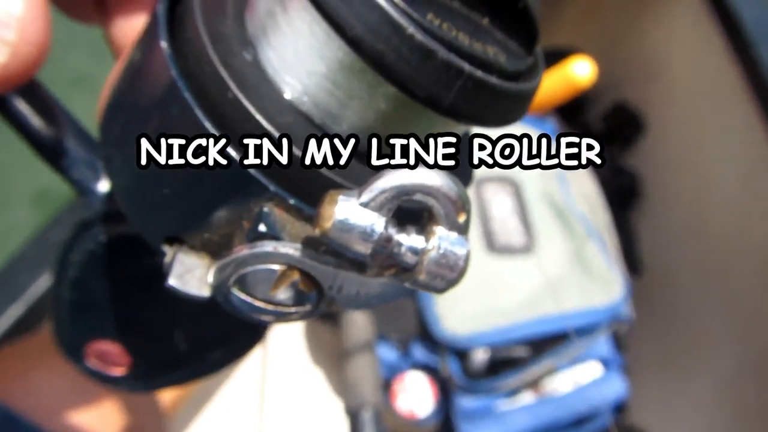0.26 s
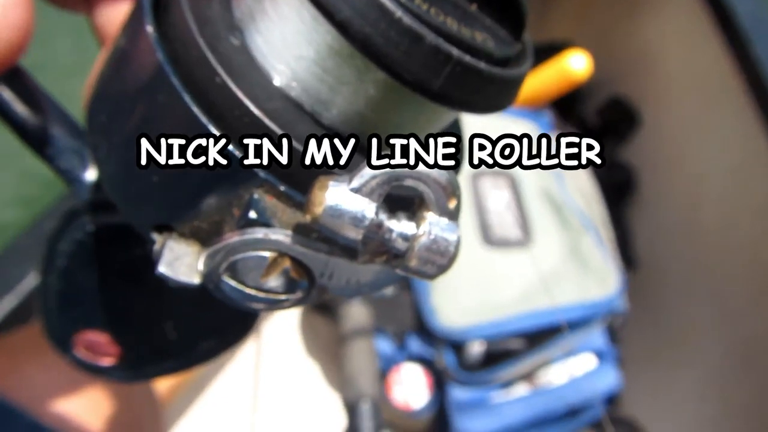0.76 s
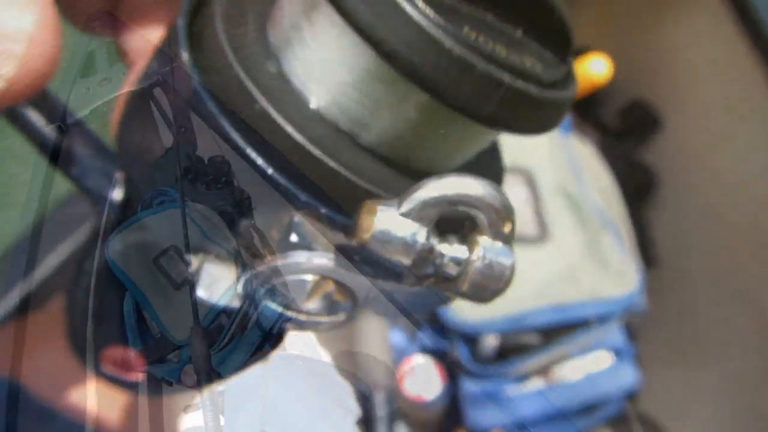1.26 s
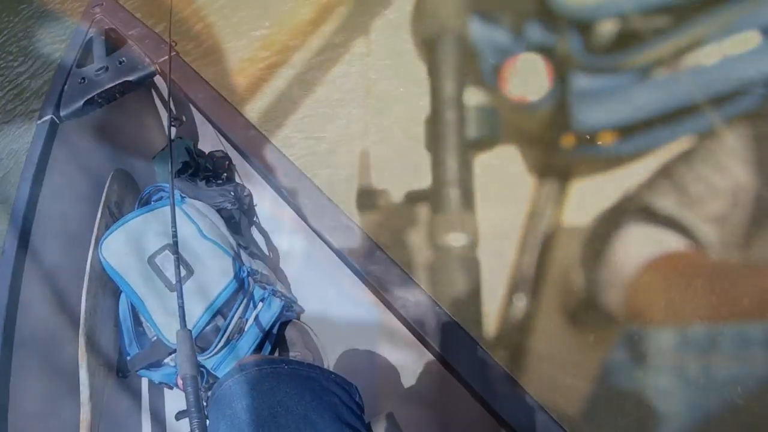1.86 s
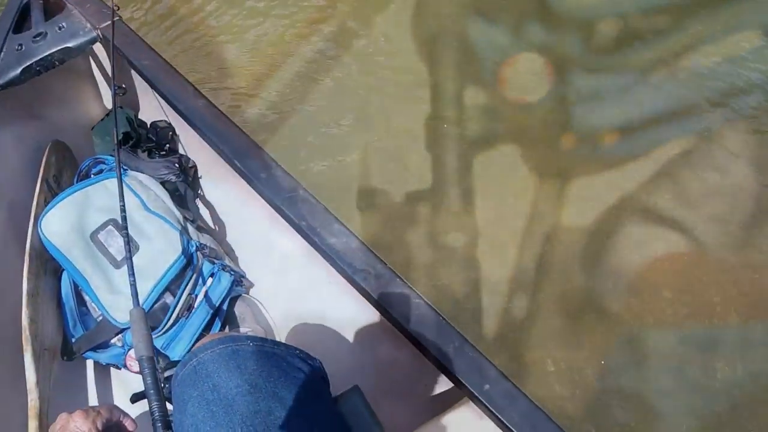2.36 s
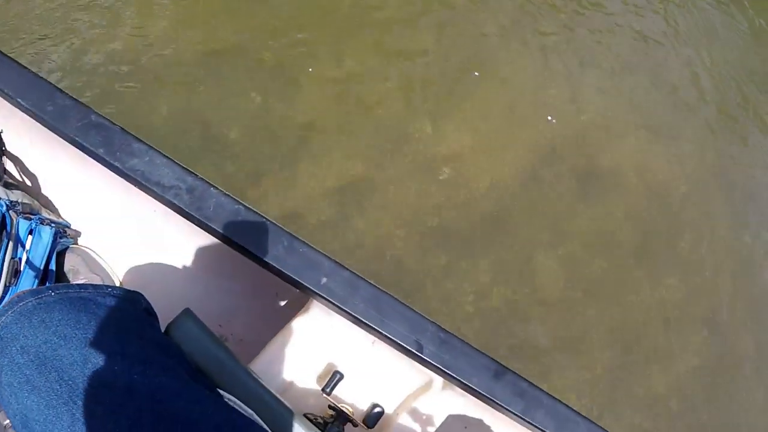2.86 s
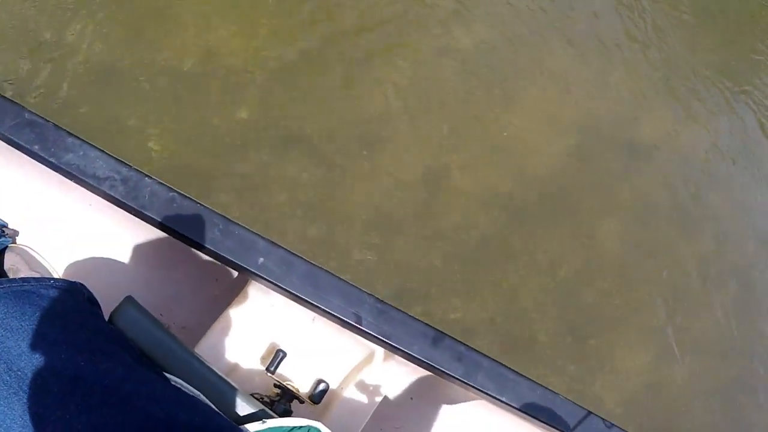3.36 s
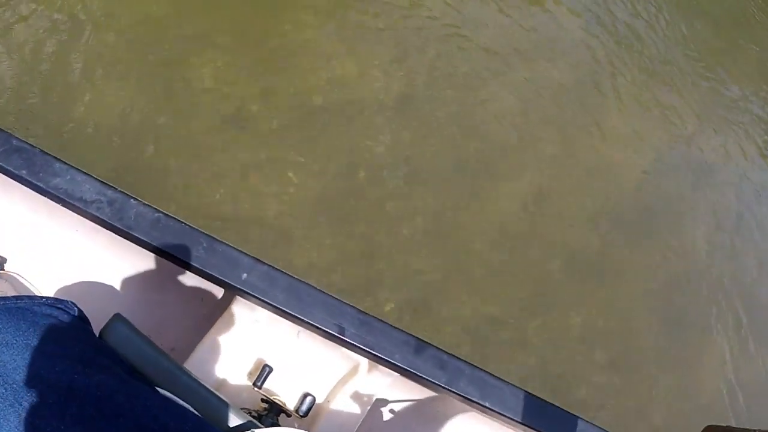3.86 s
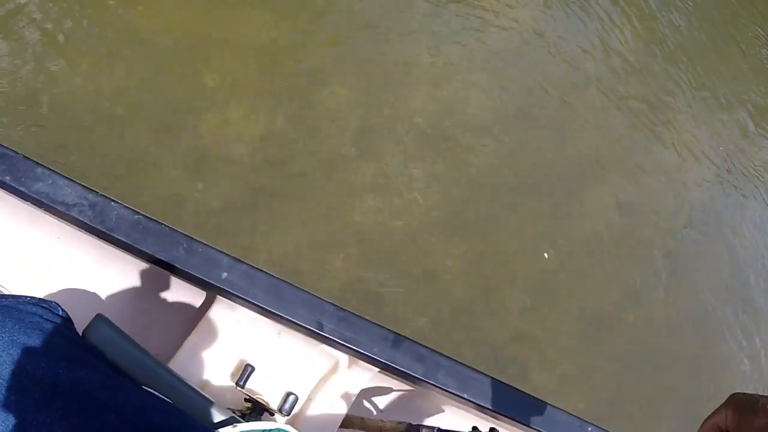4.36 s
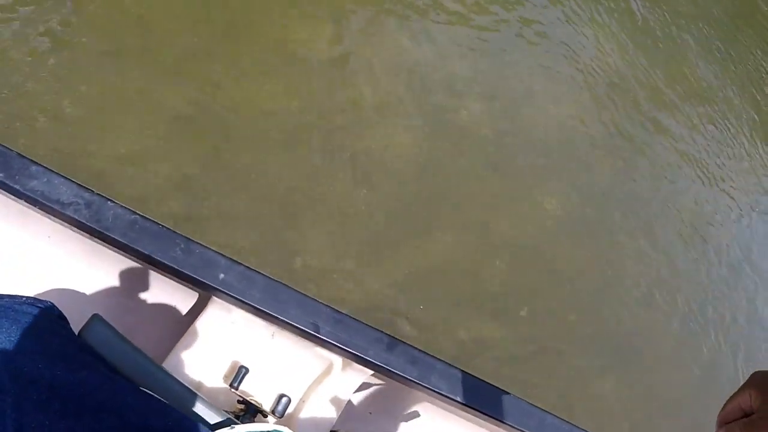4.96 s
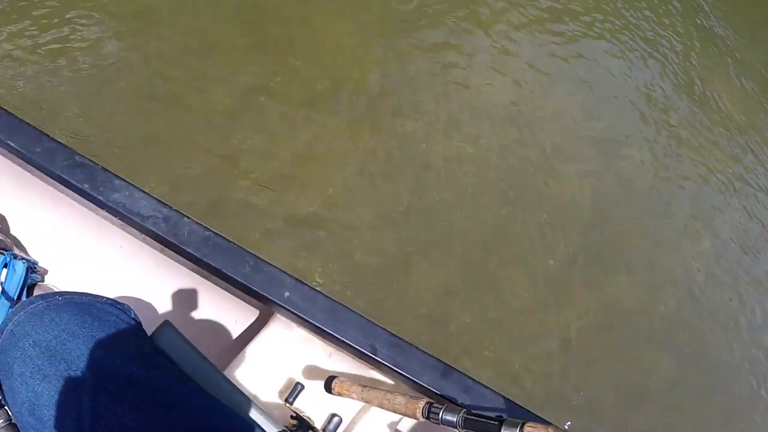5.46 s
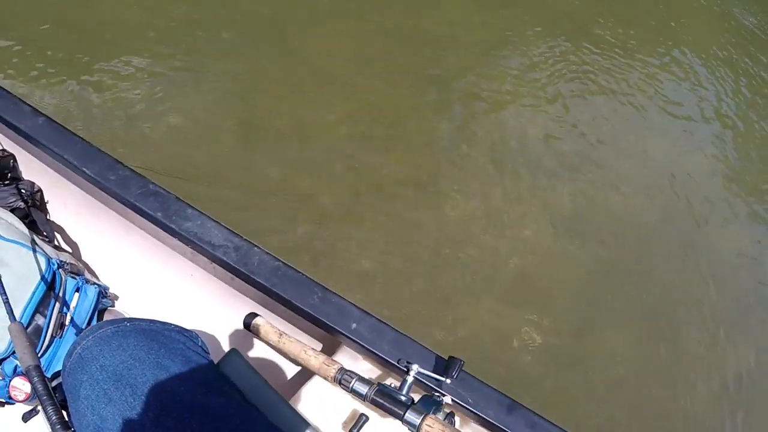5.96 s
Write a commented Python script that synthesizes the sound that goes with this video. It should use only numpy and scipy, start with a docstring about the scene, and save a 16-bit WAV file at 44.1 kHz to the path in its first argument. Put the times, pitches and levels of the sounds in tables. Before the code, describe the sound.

Quiet outdoor air with a bird chirp and light reel clicks, a brief silence, then windy microphone rumble, water gurgles and tackle knocking a hollow boat hull.

```python
"""A small camera in a canoe on a river. First a quiet close-up: calm air (shaped noise), buzzing insects (narrow
noise), a bird (gliding tones echoed by the trees), a clicking reel (bursts that ring its parts), a thin whine.
After a short silence wind buffets the microphone (low, lumpy noise) and water gurgles (rising tones). The hull
booms (fading tones), rod and tackle knock and rattle on it (bursts that ring tackle and hull, with an echo),
and they scrape along it (gritty noise)."""
import sys
import numpy as np
from scipy import signal
from scipy.fft import rfft, irfft
from scipy.io import wavfile
from scipy.ndimage import uniform_filter1d

SR = 44100
rng = np.random.default_rng(int(sys.argv[2]) if len(sys.argv) > 2 else 0)


def materialize(psi):
    """Save the field psi as 16-bit PCM at rate SR to the path in sys.argv[1].

    A 1-D psi becomes a single channel; in a 2-D psi each row is a channel.
    """
    bounded = np.clip(np.atleast_2d(psi).T, -1, 1)
    quanta = np.round(bounded * 32767).astype(np.int16)
    wavfile.write(sys.argv[1], SR, quanta)


N = 273596  # length in samples

SILENCE_START_S, SILENCE_END_S = 1.644, 1.806

# Tone colour of the calm air: f/Hz, relative level/dB
CALM_COLOUR = [(15, -48.5), (25, -14.5), (92, -0.5), (190, -13), (263, -9.5), (439, -22.5), (624, -25),
               (887, -36), (1370, -29), (1700, -39), (1890, -40.5), (3620, -49.5), (8830, -51.5),
               (9570, -52), (16000, -61.5)]
AIR_DB = -40  # before the lows are trimmed
AIR_BASS_DB, AIR_SWELL_DB = -2.5, 1  # trim of the lows, and how far they wander

INSECT_START_DB, INSECT_TOP_DB, INSECT_TOP_S = -88, -75.5, 1.17
INSECT_FADE_DB_PER_S = 28

# Bird call, one list per note, each a path of: t/s, f/Hz, level/dB
BIRD_NOTES = [
    [(0, 5270, -61.5), (.03, 5830, -63.5), (.07, 6050, -75)],
    [(.045, 4200, -61.5), (.08, 3900, -54.5), (.095, 3080, -64.5), (.115, 2260, -63)],
    [(.125, 2390, -51.5), (.14, 2760, -58.5), (.2, 2660, -94)],
]
TREES_T60_S, TREES_DB = 0.52, 3  # time for the echo to fall 60 dB; its level against the direct call

# Reel clicks, strength of each hit: t/s, parts level/dB, body level/dB, tick level/dB
REEL_CLICKS = [(0.2916, -51.5, -43.5, -67), (0.314, -52.5, -46, -69), (0.397, -44, -38, -64.5),
               (0.4293, -48, -40.5, -62), (0.4405, -54, -45, -62), (0.485, -44, -38.5, -63.5),
               (0.5, -52, -46, -64), (0.5387, -48.5, -42.5, -63), (0.5564, -55, -54, -66),
               (0.7146, -60, -48, -66), (0.752, -56, -54.5, -63), (0.776, -52.5, -42, -62),
               (1.192, -61, -38, -53), (1.27, -61, -41, -52.5), (1.28, -58, -51, -55.5),
               (1.3006, -49, -40, -51.5), (1.3126, -39.5, -33, -51.5), (1.328, -45, -36, -54),
               (1.349, -56, -39.5, -55), (1.388, -57, -42, -51)]
CLICK_RATTLE_S = 0.024
# Ringing of the small reel parts: f/Hz, relative level/dB, time to fall 60 dB/s
REEL_PARTS_MODES = [(1957, 11, 0.03), (2270, -5, 0.045), (3030, -15, 0.013)]
# Ringing of the reel body: f/Hz, relative level/dB, time to fall 60 dB/s
REEL_BODY_MODES = [(513, 7, .05), (640, 3, 0.024), (956, -4.5, .03), (1384, 3.5, 0.025)]

WHINE_START_S, WHINE_TOP_S, WHINE_DB, WHINE_RISE_DB = 1.25, 1.5, -74, 22

# Wind on the microphone, two gusty spells around a lull: t/s, rumble level/dB, buffeting level/dB
WIND_GUSTS = [(1.81, -34, -63), (1.9, -33.5, -51), (1.96, -31.5, -42), (2.2, -29.5, -44.5),
              (2.5, -35, -53.5), (2.75, -43, -41), (3.0, -31, -36.5), (3.2, -42.5, -53.5), (3.47, -32, -35),
              (3.62, -32, -37), (3.74, -40.5, -42.5), (3.88, -51, -51), (4.3, -51, -52), (4.7, -60, -59.5),
              (5.05, -41.5, -43), (5.4, -32, -37.5), (5.7, -29, -43.5), (5.9, -33.5, -31.5),
              (6.0, -30.5, -53), (6.14, -21, -62), (6.2, -37, -49)]
LUMPS_PER_S, LUMP_DB = 18, 4  # the rumble comes in uneven lumps
RUSTLE_DB, RUSTLE_SHARE = -52, 0.33  # rustle when the buffeting is at -45 dB; dB per dB of buffeting
# Tone colour of the smooth far hiss: f/Hz, relative level/dB
BREEZE_COLOUR = [(120, -28), (200, -1), (254, -10.5), (569, -18), (749, -6), (1080, -10), (1770, -14.5),
                 (3760, -19), (4860, -25), (7830, -22), (14300, -35.5), (15100, -47), (16000, -72)]
BREEZE_DB = -55.5

# Clear water gurgles at the hull: t/s, level/dB, first pitch f/Hz, length/s
CLEAR_GURGLES = [(1.848, -33.5, 668, 0.015), (2.468, -43, 790, 0.011), (3.499, -42, 504, 0.017),
                 (3.585, -44, 440, 0.036), (3.608, -44, 780, 0.016), (3.765, -42.5, 504, 0.031),
                 (3.823, -47.5, 1700, .012), (3.955, -43.5, 556, 0.032), (3.975, -40.5, 650, 0.022),
                 (4.015, -49.5, 904, 0.026), (4.108, -43, 615, 0.01), (4.433, -45.5, 600, 0.032),
                 (4.495, -45.5, 837, 0.031), (4.573, -42.5, 663, 0.021), (5.3, -48, 1150, 0.018),
                 (5.32, -48, 1240, 0.015), (5.385, -46, 580, 0.023), (5.452, -48, 1480, 0.013),
                 (5.462, -43, 410, 0.025)]
GURGLE_RISE_PER_S = 14.2  # climb per second, as a share of the first pitch

# Soft bumps that set the whole hull booming: t/s, level/dB, f/Hz, time to fall 60 dB/s
HULL_BUMPS = [(1.842, -27, 138, 0.081), (1.884, -18, 274, 0.07), (2.154, -16, 121, 0.11),
              (2.477, -15, 200, 0.03), (2.636, -19, 97, 0.04), (2.745, -28, 139, 0.27),
              (2.828, -27, 150, 0.064), (3.014, -19.5, 94.5, 0.12), (3.014, -18, 165.3, 0.14),
              (3.421, -21, 157.6, 0.18), (3.443, -11, 201, 0.068), (3.574, -21.5, 163.7, 0.14),
              (3.726, -22, 157.6, 0.092), (4.292, -30, 157.6, 0.067), (4.315, -25.5, 156, 0.077),
              (4.527, -37, 162, 0.063), (4.755, -26, 268, 0.1), (4.776, -16.5, 306, 0.078),
              (4.959, -31, 173, 0.064), (5.042, -22, 218, 0.07), (5.084, -25.5, 181, 0.13),
              (5.159, -29, 168, 0.076), (5.253, -18, 198, 0.054), (5.309, -13.5, 87, 0.1),
              (5.31, -11, 170, 0.032), (5.413, -0.5, 178, 0.028), (5.476, -18.5, 96, 0.085),
              (5.593, -12, 89, 0.046), (5.826, -17.5, 91.5, 0.14), (5.834, 0, 163, 0.06),
              (6.148, -15, 104.6, 0.072)]

# Tackle hits the hull, strength of each hit:
# t/s, clack level/dB, hull level/dB, hull colour f/Hz, tick level/dB, rattle length/s (the hull uses less)
TACKLE_KNOCKS = [(1.852, -48.5, -52, 697, -53, 0.034), (1.8703, -45, -43.5, 649, -61, 0.042),
                 (1.8978, -45, -42.5, 301, -57, 0.019), (1.9163, -46, -48, 315, -51, 0.028),
                 (2.114, -53.5, -49.5, 458, -54, 0.054), (2.15, -53, -50.5, 312, -47.5, 0.066),
                 (2.3505, -40, -52, 864, -49, 0.045), (2.4778, -52, -36.5, 486, -48, 0.021),
                 (2.766, -41.5, -46.5, 315, -35.5, 0.024), (2.82, -40, -51, 756, -36, 0.036),
                 (2.8346, -46, -45, 301, -34.5, 0.06), (2.9042, -40.5, -56.5, 999, -23.5, 0.029),
                 (2.9332, -47, -46.5, 301, -42, 0.044), (2.9774, -43.5, -54, 353, -31.5, 0.032),
                 (3.2592, -44, -54, 301, -46, 0.026), (3.3181, -31.5, -46.5, 659, -21, 0.027),
                 (3.3554, -43, -46, 999, -51, 0.026), (3.382, -42, -49, 700, -37, 0.03),
                 (3.435, -49, -41, 326, -35.5, 0.03), (3.5983, -58, -48.5, 420, -48, 0.04),
                 (3.9886, -49.5, -52.5, 700, -58, 0.039), (4.6867, -57, -62, 514, -47, 0.026),
                 (4.7156, -62, -58, 393, -45, 0.018), (4.7527, -28, -31, 700, -45, 0.012),
                 (4.7568, -47, -22, 490, -31.5, 0.027), (4.9608, -43.5, -34.5, 560, -42, 0.032),
                 (4.968, -59.5, -41, 540, -52, 0.033), (5.0394, -41.5, -32.5, 500, -41, 0.02),
                 (5.0613, -25.5, -40, 530, -25.5, 0.038), (5.1336, -44, -60, 439, -45.5, 0.047),
                 (5.252, -51, -48, 301, -63, 0.022), (5.309, -49.5, -51.5, 600, -62, 0.04),
                 (5.3444, -54, -51, 406, -54, 0.02), (5.433, -56, -51.5, 400, -65, 0.03),
                 (5.575, -22, -31.5, 635, -20.5, 0.033), (5.61, -44.5, -54, 374, -60, 0.033),
                 (5.658, -38.5, -47.5, 331, -62, 0.03), (5.6854, -62, -51, 415, -44, 0.024),
                 (5.7647, -28.5, -41.5, 820, -22, 0.045), (5.7746, -34, -41.5, 700, -46, 0.06),
                 (5.8311, -15, -26.5, 680, -50, 0.019), (5.85, -38, -47.5, 417, -37, 0.046),
                 (5.8649, -38.5, -38.5, 301, -23.5, 0.016), (6.1454, -48.5, -70, 318, -61, 0.024)]
# Ringing of the tackle: f/Hz, relative level/dB, time to fall 60 dB/s
TACKLE_MODES = [(1233, -3, .035), (1630, -4, .03), (1865, 0, .04), (2015, -2, .04), (2200, 0, .04),
                (2420, -4, .03), (2700, -4, .03), (3000, -4, .03), (3770, -8, .025)]
# Ringing of the hull skin: f/Hz, relative level/dB, time to fall 60 dB/s
HULL_MODES = [(320, -4, .15), (410, -9, .08), (480, -3, .1), (534, 0, .14), (600, -1, .11), (672, -3, .09),
              (770, -8, .06), (850, -9, .06), (1000, -14, .04)]
CLACK_HZ, CLACK_HZ_PER_DB = 1495, 21  # colour of a -43.5 dB clack; harder blows are brighter
THUD_DB = 7.5  # the dull part of a blow that does not ring on
TAP_DB, TAP_SPREAD_DB, TAP_RATTLE_S = -56, 5, 0.034  # faint taps of loose tackle: weakest, range, length
INSIDE_T60_S, INSIDE_DB = 0.063, -7  # echo inside the boat

# Tackle dragged along the hull, strength of the grit: t/s, length/s, level/dB, brightness level/dB
TACKLE_SCRAPES = [(2.763, 0.14, -44.5, -24), (3.393, 0.023, -47, -5)]
SCRAPE_ATTACK_DB_PER_S, SCRAPE_RELEASE_DB_PER_S = 600, 298

TOP_HZ = 15700


def undb(db):
    """Turn decibels into a plain factor."""
    return 10 ** (np.asarray(db, float) / 20)


def unit(x):
    """Scale a sound to an average (rms) level of 1."""
    return x / np.sqrt(np.mean(x ** 2))


def noise():
    """Plain hiss for the whole length."""
    return rng.standard_normal(N)


def curve(rows, outside=-140.):
    """Draw the columns of a table as lines over time."""
    s, *columns = np.transpose(rows)
    return [np.interp(np.arange(N) / SR, s, column, outside, outside) for column in columns]


def band(x, lo_hz, hi_hz, order=2):
    """Keep mainly the sound between two frequencies."""
    sos = signal.butter(order, [lo_hz, min(hi_hz, .45 * SR)], "bandpass", fs=SR, output="sos")
    return signal.sosfilt(sos, x)


def walk(rate):
    """A random wander: values held for 1 / rate seconds, then smoothed twice; spread near 1."""
    hold = int(SR / rate)
    steps = np.repeat(rng.standard_normal(N // hold + 1), hold)
    return 1.21 * uniform_filter1d(uniform_filter1d(steps, hold), hold)[:N]


def coloured(points):
    """Steady noise with the given tone colour, at an rms level of 1."""
    hz, db = np.transpose(points)
    log_hz = np.log(np.maximum(np.fft.rfftfreq(N, 1 / SR), 1))
    colour = undb(np.interp(log_hz, np.log(hz), db, -120, -120))
    return unit(irfft(rfft(noise()) * colour, N))


def ring(x, modes):
    """A struck object sings at its own fading pitches; noise of rms 1 comes out near rms 1."""
    out, power = 0, 0
    for hz, db, t60 in modes:
        keep = np.exp(-np.log(1000) / (t60 * SR))  # share left after each sample
        pole = keep * np.exp(2j * np.pi * hz / SR)
        out = out + undb(db) * np.sqrt(1 - keep) * signal.lfilter([1], [1, -pole], x).imag
        power += undb(db) ** 2 / 4
    return out / np.sqrt(power)


def blows(times, db, length, grit_db, strike=0., favoured_hz=None, spread=1.6):
    """Each blow is a first strike and a rattle of uneven contacts that holds briefly, then dies fast."""
    out, t = np.zeros(N), np.arange(SR // 8) / SR
    grit = undb(grit_db * np.resize(walk(400), N + len(t)))
    rattle = rng.standard_normal(N + len(t)) * grit
    for k, (s, gain, fade) in enumerate(zip(times, undb(db), length)):
        i = int(s * SR)
        shape = 1000. ** -(t / max(fade, .003)) ** 1.294
        burst = shape * rattle[i:i + len(t)]
        burst[0] += strike * np.sqrt(np.sum(burst ** 2))
        if favoured_hz is not None:  # the spot that is hit decides which pitches speak most
            burst = band(burst, favoured_hz[k] / spread, favoured_hz[k] * spread, order=1)
        level = gain * np.sqrt(np.sum(shape ** 2) / np.sum(burst ** 2))
        out[i:i + len(t)] += (level * burst)[:N - i]
    return out


def echo(x, t60, db):
    """Many blurred reflections: the sound plus a fading noisy tail of it."""
    t = np.arange(SR) / SR
    tail = rng.standard_normal(SR) * 1000. ** (-t / t60)
    tail = tail / np.sqrt(np.sum(tail ** 2))
    return x + undb(db) * signal.fftconvolve(x, tail)[:N]


def calm_air():
    """Still air: soft shaped noise whose lows wander slowly in level."""
    air = undb(AIR_DB) * coloured(CALM_COLOUR)
    bass_gain = undb(AIR_BASS_DB + AIR_SWELL_DB * walk(1.7))
    return air + (bass_gain - 1) * band(air, 11, 900, order=1)


def insects():
    """A high, narrow, flickering buzz that grows, then fades."""
    t = np.arange(N) / SR
    buzz_db = np.interp(t, [0, INSECT_TOP_S], [INSECT_START_DB, INSECT_TOP_DB])
    buzz_db = buzz_db - INSECT_FADE_DB_PER_S * np.maximum(t - INSECT_TOP_S, 0)
    return unit(band(noise(), 9450, 10050)) * undb(buzz_db + 3.1 * walk(40))


def bird():
    """Hoarse gliding whistles with an unsteady pitch, smeared by echoes from the trees."""
    out, waver = np.zeros(N), walk(500)
    for note in BIRD_NOTES:
        hz, db = curve(note)
        wavering_hz = np.maximum(hz, 0) * (1 + .04 * waver)
        out += undb(db) * np.sin(2 * np.pi * np.cumsum(wavering_hz) / SR)
    return echo(out, TREES_T60_S, TREES_DB)


def reel():
    """Small plastic and metal parts click: short hits ring the parts and body, with a bright tick."""
    s, parts_db, body_db, tick_db = np.transpose(REEL_CLICKS)
    length = np.full(len(s), CLICK_RATTLE_S)
    parts = ring(blows(s, parts_db, length, 1.3, strike=0.99), REEL_PARTS_MODES)
    body = ring(blows(s, body_db, length, 1.5, strike=1.8), REEL_BODY_MODES)
    tick = band(blows(s, tick_db, length, 1.8), 2600, 9100)
    return band(parts, 1000, 7000, order=1) + band(body, 440, 2300, order=1) + tick


def whine():
    """A thin, high, steady tone that rises in level and stays."""
    t = np.arange(N) / SR
    db = np.interp(t, [WHINE_START_S, WHINE_TOP_S], [WHINE_DB - WHINE_RISE_DB, WHINE_DB], -140)
    return undb(db) * np.sin(2 * np.pi * 12409 * t)


def wind():
    """Eddies push the microphone's diaphragm in uneven lumps over a smooth far hiss."""
    rumble_db, buffet_db = curve(WIND_GUSTS)
    rumble = unit(band(noise(), 17.6, 61.1)) * undb(rumble_db + LUMP_DB * walk(LUMPS_PER_S))
    buffet = unit(band(noise(), 109, 192.7)) * undb(buffet_db + 4.0 * walk(30))
    patches = 0  # six bands that flicker separately, weaker towards the top
    for k, hz in enumerate(230 * 1.59 ** np.arange(6)):
        patches = patches + undb(-4.5 * k + 4.5 * walk(25)) * unit(band(noise(), hz, 1.5 * hz))
    rustle = unit(patches) * undb(RUSTLE_DB + RUSTLE_SHARE * (buffet_db + 45))
    return rumble + buffet + rustle + undb(BREEZE_DB) * coloured(BREEZE_COLOUR)


def water():
    """Bubbles rise in pitch as they close; many small ones patter under the clear ones."""
    when, pitch, size = rng.random((260, 3)).T
    hz = 350 * 7.2 ** pitch
    small = np.transpose([SILENCE_END_S + 4.4 * when, -58 + 9 * size, hz, 9 / hz])
    out = np.zeros(N)
    for s, db, first_hz, length in [*CLEAR_GURGLES, *small]:
        part = np.linspace(0, 1, int(length * SR))  # 0 to 1 through the bubble
        rising_hz = first_hz * (1 + GURGLE_RISE_PER_S * length * part)
        phase = 2 * np.pi * np.cumsum(rising_hz) / SR
        bubble = undb(db) * np.sin(np.pi * part ** 0.53) * np.sin(phase)
        i = int(s * SR)
        out[i:i + len(part)] += bubble[:max(N - i, 0)]
    return out


def bumps():
    """A soft push on the hull: the boom swells quickly and fades."""
    out, t = np.zeros(N), np.arange(SR // 3) / SR
    for s, db, hz, t60 in HULL_BUMPS:
        i = int(s * SR)
        swell = 1 - np.exp(-t / 0.0031)
        fade = 1000. ** (-t / max(t60, .02))
        boom = swell * fade * np.sin(2 * np.pi * hz * t)
        out[i:i + len(t)] += (undb(db) * boom)[:N - i]
    return out


def knocks():
    """A blow rings the tackle and the hull skin, starts with a bright tick and echoes inside the boat."""
    when, size, spot = rng.random((18, 3)).T
    tap_db = TAP_DB + TAP_SPREAD_DB * size
    taps = np.transpose([SILENCE_END_S + 4.3 * when, tap_db, tap_db - 9, 300 + 300 * spot,
                         tap_db - 15, np.full(18, TAP_RATTLE_S)])
    s, clack_db, hull_db, hull_hz, tick_db, length = np.transpose([*TACKLE_KNOCKS, *taps])

    clack_hz = CLACK_HZ + CLACK_HZ_PER_DB * (clack_db + 43.5)
    clack = blows(s, clack_db, length, 2.6, strike=0.38, favoured_hz=clack_hz, spread=1.42)
    tackle = undb(-15) * ring(clack, TACKLE_MODES) + band(clack, 600, 2820)

    push = blows(s, hull_db, 0.71 * length, 1.9, strike=1.15, favoured_hz=hull_hz, spread=1.6)
    thud = undb(THUD_DB) * band(push, 186, 860)
    hull = band(undb(-2.5) * ring(push, HULL_MODES) + thud, 140, 1500, order=1)

    contact = blows(s, tick_db, length, 4.1)
    tick = band(contact, 3060, 6030, order=3) + undb(-18.5) * band(contact, 8200, 10860, order=3)
    return echo(tackle + hull + tick, INSIDE_T60_S, INSIDE_DB)


def scrapes():
    """Stick and slip: gritty noise in tackle and hull, with a thin squeak."""
    t, out = np.arange(N) / SR, 0
    for s, length, db, bright_db in TACKLE_SCRAPES:
        attack_db = SCRAPE_ATTACK_DB_PER_S * np.maximum(s - t, 0)
        release_db = SCRAPE_RELEASE_DB_PER_S * np.maximum(t - s - length, 0)
        shape_db = np.maximum(db - attack_db - release_db, -200)
        grit = noise() * undb(shape_db + 2.8 * walk(250) + 2.5 * walk(45))
        tackle = undb(-10) * band(ring(grit, TACKLE_MODES), 780, 5500)
        hull = undb(1.0) * band(ring(grit, HULL_MODES), 260, 1000)
        rasp = undb(10.5) * band(grit, 750, 2580)
        squeak = undb(10.5) * band(grit, 3560, 3870, order=1)
        out = out + tackle + hull + rasp + squeak + undb(bright_db) * band(grit, 2500, 5500)
    return out


def scene():
    """The calm close-up stops dead; after the silence the windy part opens."""
    t = np.arange(N) / SR
    calm = calm_air() + insects() + bird() + reel() + whine()
    windy = wind() + water() + bumps() + knocks() + scrapes()
    opening = np.clip((t - SILENCE_END_S) / .003, 0, 1)
    return (calm * (t < SILENCE_START_S) + windy * opening)[None]


def record(dry):
    """The camera rounds the loudest peaks and cuts the top."""
    rounded = np.tanh(1.44 * dry) / 1.349
    return signal.sosfilt(signal.ellip(8, .2, 70, TOP_HZ, fs=SR, output="sos"), rounded)


dry = scene()
out = record(dry)
materialize(out)
```